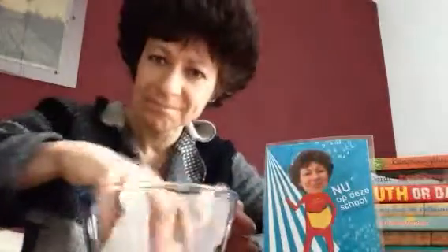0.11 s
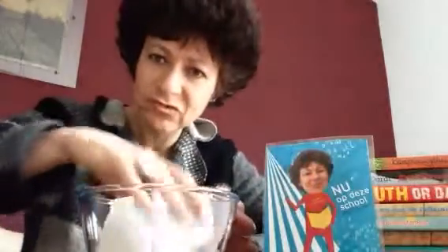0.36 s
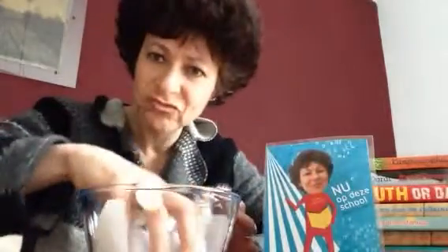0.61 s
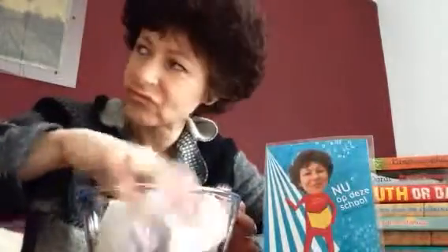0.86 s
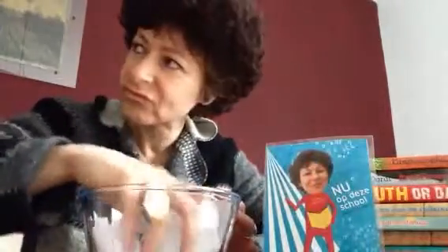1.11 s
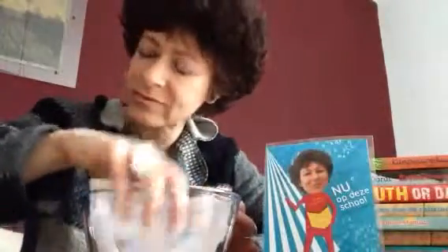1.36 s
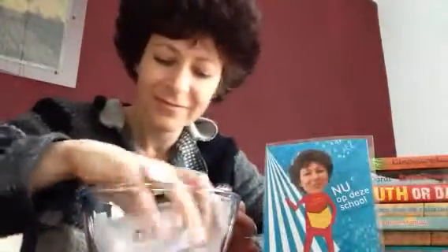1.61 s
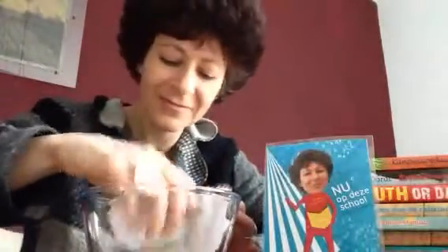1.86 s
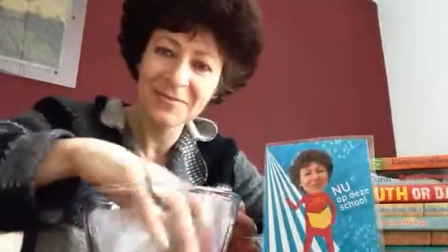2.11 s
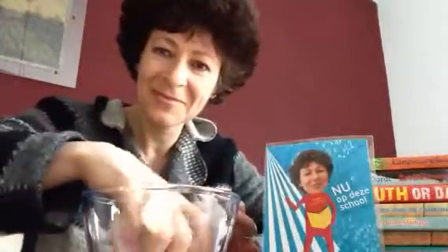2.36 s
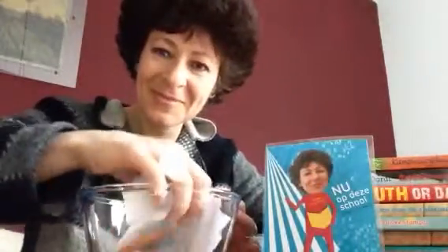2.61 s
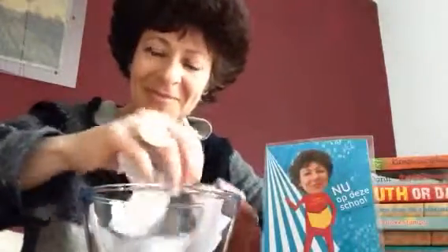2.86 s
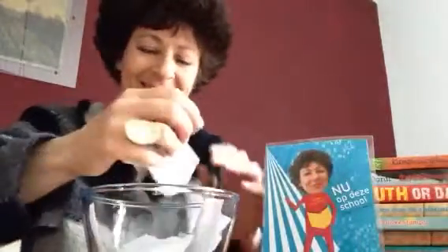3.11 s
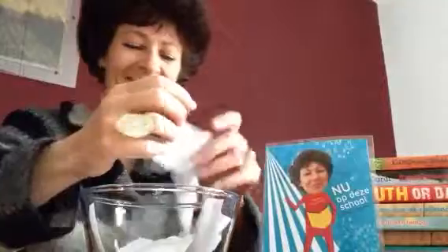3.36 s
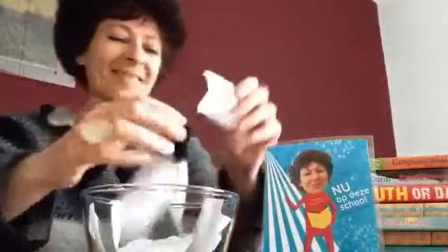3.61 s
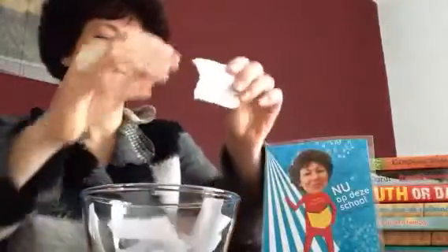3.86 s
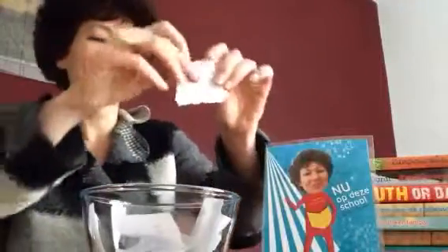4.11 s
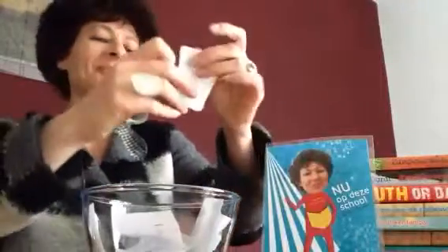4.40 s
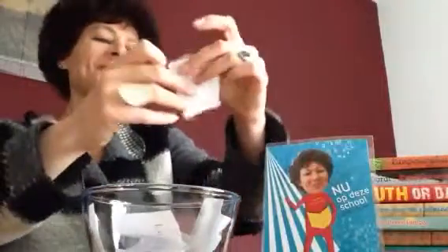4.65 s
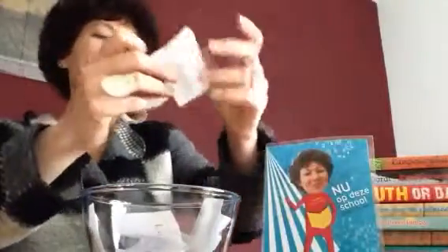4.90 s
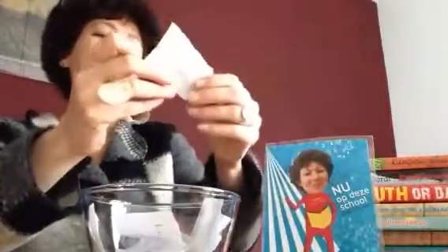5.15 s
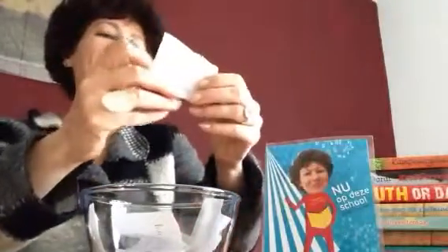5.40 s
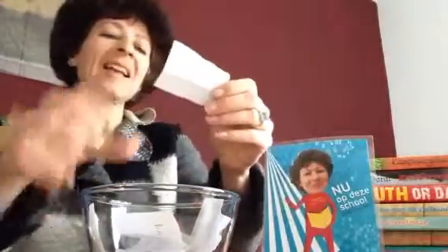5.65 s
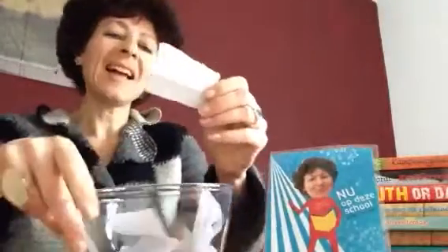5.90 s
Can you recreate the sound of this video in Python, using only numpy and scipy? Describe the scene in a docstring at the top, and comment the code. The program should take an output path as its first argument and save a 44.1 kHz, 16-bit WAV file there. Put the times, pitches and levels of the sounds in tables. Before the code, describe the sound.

Close, dry paper rustling inside a glass bowl, a hard early thump and small glass clinks, then sparse crisp snaps of a slip opening.

```python
"""A small furnished room, one close microphone: a hand stirs folded paper slips in a glass bowl on a
wooden table, then unfolds one slip in the air. Clumped clicks through bowl resonances make the crackle,
finer ones the hiss of sliding paper; creases snap as short resonant bursts. Bumps ring the modes of the
table, a finger ring those of the glass, and drags hum as noise in one low band. Filtered noise is the echo."""
import sys
import numpy as np
from scipy import signal
from scipy.fft import rfft, irfft
from scipy.io import wavfile

SR = 44100
rng = np.random.default_rng(int(sys.argv[2]) if len(sys.argv) > 2 else 0)


def wav_out(sig):
    """Save sig, one row per channel (or a flat mono array), as 16-bit PCM at SR to the path in sys.argv[1]."""
    wavfile.write(sys.argv[1], SR, np.round(np.clip(np.atleast_2d(sig).T, -1, 1) * 32767).astype(np.int16))


def amplitude_ratio(level_db):
    """Convert a level in decibels to the matching linear amplitude (field) ratio."""
    exponent = np.asarray(level_db, float) / 20
    return 10 ** exponent


N = 264688


def unit_rms(x):
    """Scale to unit rms."""
    return x / np.sqrt(np.mean(x ** 2) + 1e-20)


def drift(rate_hz):
    """Slow random wander of rms 1: noise through a double one-pole low-pass."""
    r = np.exp(-2 * np.pi * rate_hz / SR)
    noise = rng.standard_normal(N + SR)
    return unit_rms(signal.lfilter([1], [1, -2 * r, r * r], noise)[SR:])


def coloured(x, spectrum):
    """Filter by a spectrum drawn on a log-frequency axis; rms 1."""
    hz, level_db = np.transpose(spectrum)
    grid_hz = np.maximum(np.fft.rfftfreq(N, 1 / SR), 1)
    gain = amplitude_ratio(np.interp(np.log(grid_hz), np.log(hz), level_db))
    return unit_rms(irfft(rfft(x) * gain, N))


def ring(clicks, hz, t60_s):
    """Damped mode: a unit click starts a sine of height 1."""
    r, w = amplitude_ratio(-60 / (t60_s * SR)), 2 * np.pi * hz / SR
    return signal.lfilter([0, np.sin(w)], [1, -2 * r * np.cos(w), r * r], clicks + 1e-18)


def damped(t60_s, loss_per_s):
    """Decay time of a mode once a touch adds its loss."""
    return 1 / (1 / t60_s + loss_per_s)


def resonance(x, hz, width_hz):
    """Two-pole band-pass, peak gain 1."""
    r = np.exp(-np.pi * width_hz / SR)
    poles = [1, -2 * r * np.cos(2 * np.pi * hz / SR), r * r]
    return signal.lfilter([(1 - r * r) / 2, 0, (r * r - 1) / 2], poles, x)


def add(out, start_s, sound):
    """Mix a short sound in at its start time."""
    at = round(start_s * SR)
    out[at:at + len(sound)] += sound[:N - at]


def grains(per_s, spread_db, clump_db, clump_rate_hz):
    """Tiny clicks of random size and sign, in clumps."""
    sizes = amplitude_ratio(spread_db * np.minimum(rng.exponential(1, N), 5)) * rng.choice([-1, 1], N)
    hits = rng.random(N) < per_s / SR
    return sizes * hits * amplitude_ratio(clump_db * drift(clump_rate_hz))


# Resonances of the air in the bowl. Each row: frequency in Hz, width in Hz, relative level in dB.
BOWL_MODES = [(689.3, 41, 2.5), (1090, 320, -2.5), (1383, 160, -0.5), (1620, 80, 1.5), (2050, 270, -7.5),
              (2500, 86, -1), (2930, 240, -10.5)]
# Crackle spectrum outside the bowl. Each row: frequency in Hz, relative level in dB per Hz.
CRACKLE_SPECTRUM = [(180, -36), (300, -5.5), (416, -11), (704, 0), (1020, 12.5), (1570, -2), (1870, -3.5),
                    (2460, 1.5), (6000, -47), (7800, -41.5), (13200, -120)]


def crackle(clicks, inside):
    """Fibres and folds give clicks, heard partly through the air in the bowl."""
    bowl = np.zeros(N)
    for k, (hz, width_hz, db) in enumerate(BOWL_MODES):
        favoured = clicks * amplitude_ratio(3.9 * drift(37.0))  # the moving hand favours one resonance, then another
        bowl += amplitude_ratio(db) * resonance(favoured, hz, width_hz) * (-1) ** k
    return inside * unit_rms(bowl) + (1 - 0.93 * inside) * coloured(clicks, CRACKLE_SPECTRUM)


# Hiss of paper faces in the bowl. Each row: frequency in Hz, relative level in dB per Hz.
SLIDE_IN_BOWL = [(1760, -4.5), (3000, -5.5), (3740, -8.5), (6390, -8), (9260, -12.5), (14300, -17),
                 (15500, -6)]
# The same hiss in the open air. Each row: frequency in Hz, relative level in dB per Hz.
SLIDE_IN_AIR = [(500, -10.5), (1100, -4), (2200, -3.5), (3550, -13), (4600, -6), (6400, -5), (9000, -15),
                (15500, -10.5)]


def slide(clicks, inside):
    """Faces of paper slide: dense fine clicks blur into hiss."""
    fine = grains(per_s=7900, spread_db=2, clump_db=1.5, clump_rate_hz=30)
    faces = unit_rms(fine) + 0.06 * unit_rms(clicks)  # every crack also has a bright edge
    shut = np.clip(inside / inside.max(), 0, 1)
    return np.sqrt(shut) * coloured(faces, SLIDE_IN_BOWL) + (1 - shut) * coloured(faces, SLIDE_IN_AIR)


# Modes of the table, also rung by bumps().
# Each row: frequency in Hz, relative level in dB, undamped t60 in seconds.
TABLE_MODES = [(116, -33, 0.12), (176.5, -14, 1.1), (235, 0, 0.16), (345, -11, .14), (384, -17, 0.4),
               (445, -14, 0.25), (548, -18, 0.2), (700, -18, .1), (805, -11, 0.15), (935, -8, 0.12),
               (1070, -14, 0.05), (1360, -13, .03), (1850, -4, .012)]


def table_shake():
    """Stirring shakes the table: wandering noise through wide bands at five of its modes; rms 1."""
    rubbing = rng.standard_normal(N) * amplitude_ratio(3 * drift(6.7))
    return unit_rms(sum(resonance(rubbing, hz, 0.26 * hz) for hz, _, _ in TABLE_MODES[1:6]))


# Fingers close on a bunch of slips.
# Each row: time of peak in seconds, crackle in dB, hiss in dB, length in seconds.
SQUEEZES = [(0.141, -41, -49.5, 0.088), (0.267, -46, -40.5, 0.021), (0.533, -37, -64, 0.054),
            (0.685, -33, -46.5, 0.043), (0.775, -31, -43.5, 0.036), (0.947, -54, -57, 0.036),
            (1.107, -60, -52.5, 0.033), (1.256, -51.5, -51, 0.096), (1.445, -55, -55, 0.03),
            (1.498, -45, -72, 0.033), (1.604, -47.5, -60, 0.16), (1.823, -61, -57, 0.032),
            (1.91, -31.5, -36.5, 0.0056), (1.987, -30, -37, 0.0084), (2.177, -47, -53.5, 0.098),
            (2.412, -47, -68, 0.033), (2.465, -40, -44, 0.024), (2.642, -62, -67, 0.038),
            (2.692, -45, -45.5, 0.018), (2.994, -61, -61.5, 0.13), (3.519, -66, -59, 0.15),
            (3.636, -84, -62, 0.052), (3.777, -58.5, -61, 0.028), (3.885, -49, -50.5, 0.013),
            (4.238, -84, -70.5, 0.072), (4.74, -82, -61.5, 0.083), (4.886, -84, -57.5, 0.026),
            (5.256, -87.5, -67, 0.025), (5.392, -69, -55, 0.018), (5.579, -84, -71, 0.04),
            (5.668, -64.5, -63.5, 0.031), (5.763, -73, -65.5, 0.0051), (5.848, -51, -63, 0.026)]


def squeezes():
    """Gain curves of crackle and hiss: each squeeze swells to its peak and dies away."""
    rise = 0.41  # share of the length spent swelling
    hop = 64     # samples per curve point
    peak_s, crackle_db, hiss_db, length_s = (c[:, None] for c in np.transpose(SQUEEZES))
    late = (np.arange(0, N + hop, hop) / SR - peak_s) / length_s
    shape = np.exp(np.where(late < 0, -(late / rise) ** 2, -late / (1 - rise)))
    points = np.arange(late.shape[1])
    return [np.interp(np.arange(N) / hop, points, np.sum(amplitude_ratio(db) * shape, axis=0))
            for db in (crackle_db, hiss_db)]


# Changing bed of the handling, under the single squeezes.
# Each row: time in seconds, crackle in dB, hiss of sliding faces in dB, table shake in dB.
HANDLING = [(0, -54, -54.5, -51.5), (.2, -69, -54, -72.5), (.45, -66, -61, -45), (.62, -62, -56.5, -52.5),
            (.8, -53.5, -52.5, -72), (1.2, -49.5, -56, -85), (1.68, -59.5, -55, -67),
            (1.79, -74, -67.5, -63), (1.85, -67, -53, -65.5), (2.1, -57.5, -53, -81),
            (2.31, -61, -64.5, -62), (2.37, -50.5, -51.5, -58), (2.62, -52.5, -50, -77),
            (2.76, -59, -59, -71), (2.93, -66, -66, -70), (3.168, -69, -66, -74), (3.219, -75, -80.5, -83),
            (3.419, -73, -80.5, -74), (3.601, -81, -76, -71), (3.901, -66, -65, -85),
            (4.099, -78.5, -82, -71), (4.249, -82, -70.5, -73.5), (4.42, -77, -65, -89.5),
            (4.449, -73, -62.5, -70), (4.7, -86, -64.5, -71.5), (4.921, -68.5, -67, -74),
            (5.1, -75, -73, -73), (5.781, -82.5, -80, -74.5), (5.83, -68.5, -61.5, -48),
            (6, -54.5, -71, -62)]
# Crackle made inside the bowl. Each row: time in seconds, share 0-1.
INSIDE_SHARE = [(0, 0.88), (3.05, 0.78), (3.3, 0.37), (5.75, 0.037), (5.821, 0.24)]


def rustle():
    """Crackle and hiss follow bed plus squeezes; the table shake follows the bed."""
    t = np.arange(N) / SR
    s, *levels_db = np.transpose(HANDLING)
    crackle_gain, slide_gain, shake_gain = (amplitude_ratio(np.interp(t, s, db)) for db in levels_db)
    crackle_squeeze, slide_squeeze = squeezes()
    inside = np.interp(t, *np.transpose(INSIDE_SHARE))
    clicks = grains(per_s=450, spread_db=3, clump_db=2.5, clump_rate_hz=10)
    paper = (crackle_gain + crackle_squeeze) * crackle(clicks, inside)
    paper += (slide_gain + slide_squeeze) * slide(clicks, inside)
    return paper + shake_gain * table_shake()


# Slip held open, ringing as a small sheet.
# Each row: frequency in Hz, width as share of frequency, relative level in dB.
SHEET_MODES = [(420, .4, -1.5), (900, 0.37, -6.5), (1247, 0.15, 0.5), (2360, 0.34, -3), (4170, .22, -12.5),
               (6730, .15, -16)]
# Creases snapping. Each row: start in seconds, body peak in dB, pitch in Hz, treble peak in dB,
# fade in seconds (0.5 ms at least).
SNAPS = [(0.102, -39, 2200, -57, 0.0036), (.122, -36, 1480, -59, 0.0011), (0.158, -41, 1370, -60, 0.0055),
         (0.2605, -34, 3000, -34, 0.0044), (0.46, -40.5, 2500, -48, 0.0065),
         (0.528, -32, 1790, -55, 0.0018), (0.544, -33, 2030, -54, 0.0024), (.668, -40, 1453, -48, .005),
         (.693, -29, 1620, -54, 0.0034), (.706, -39, 1490, -68, 0.0024), (.764, -31, 1510, -47, 0.0011),
         (.7775, -27, 1430, -50, 0.0028), (0.823, -35.5, 1570, -40, 0.011), (0.905, -33, 2300, -40, 0.0098),
         (0.954, -36.5, 930, -41, 0.0021), (1.04, -35, 2880, -60, 0.0045),
         (1.258, -30.5, 1340, -52, 0.0041), (1.267, -40, 1300, -52, 0.0024),
         (1.31, -38.5, 2500, -40, 0.006), (1.355, -39, 1330, -48.5, 0.0032),
         (1.419, -41, 1120, -45, 0.0089), (1.482, -35.5, 800, -70, 0.0034), (1.504, -33, 1520, -60, 0.0024),
         (1.494, -35.5, 730, -60, 0.002), (1.531, -29, 950, -57, 0.0011), (1.535, -32.5, 2050, -57, 0.0021),
         (1.555, -36, 2000, -60, 0.0017), (1.57, -36, 2070, -60, 0.0057), (1.583, -33, 1300, -55, 0.0029),
         (1.654, -48, 2310, -45, 0.0022), (1.909, -51, 1420, -36, 0.0021), (1.987, -39, 1570, -39, 0.00039),
         (2.15, -34.5, 1460, -40.5, 0.0077), (2.173, -32.5, 1500, -56, 0.0032),
         (2.39, -35.5, 1680, -43, 0.0074), (2.4015, -38, 1750, -55, 0.0017), (2.423, -51, 1000, -56, 0.002),
         (2.442, -38, 790, -56, 0.0023), (2.464, -32, 1720, -31.5, 0.0029),
         (2.477, -36.5, 1580, -42, 0.0048), (2.536, -39.5, 1400, -46, 0.0023),
         (2.597, -46, 1900, -44, 0.0024), (2.634, -34, 1280, -64, 0.0099), (2.687, -34.5, 900, -48, 0.009),
         (2.691, -42, 1500, -36, 0.0062), (2.947, -46, 2580, -45, 0.0035), (2.981, -43, 2500, -44, 0.023),
         (3.476, -39, 1440, -58, 0.0011), (3.484, -33, 1350, -72, 0.0026), (3.538, -50, 750, -52, 0.0011),
         (3.566, -36, 1003, -48, 0.0053), (3.604, -55, 2200, -56, .001), (3.655, -47.5, 2020, -62, 0.0018),
         (3.636, -47, 1960, -44.5, 0.0043), (3.761, -51, 1204, -47, 0.004),
         (3.774, -42.5, 2650, -42.5, 0.0054), (3.834, -50, 1130, -68.5, 0.0033),
         (3.865, -39.5, 2310, -60, 0.0065), (3.883, -33.5, 1310, -62, 0.0019),
         (4.238, -54.5, 1400, -60, 0.0037), (4.268, -55, 6200, -52, 0.0039),
         (4.7485, -32.5, 1480, -60, 0.00096), (4.7537, -19, 2090, -62, 0.0016),
         (4.7658, -41, 1460, -60, 0.00048), (4.769, -37, 2500, -60, 0.003), (4.79, -45, 3020, -62, 0.00074),
         (4.829, -42, 2150, -60, 0.0031), (4.9032, -27.5, 2160, -57, 0.0011),
         (4.996, -54.5, 1166, -70.5, 0.0028), (5.029, -28.5, 1300, -68, 0.0026),
         (5.253, -53.5, 1346, -55, 0.0019), (5.391, -42, 4450, -55, 0.004), (5.405, -50, 2100, -54, 0.0023),
         (5.663, -52, 920, -61, 0.0069), (5.698, -51, 1006, -46.5, 0.0043), (5.754, -50, 5300, -44.5, 0.01),
         (5.817, -38, 1210, -45, 0.00054), (5.83, -38, 690, -65, 0.003), (5.842, -34.5, 1140, -58, 0.001),
         (5.849, -36, 1300, -51, 0.0038), (5.861, -36, 1190, -62, 0.0012), (5.862, -44, 1190, -59, 0.0019),
         (5.875, -33, 990, -46, 0.0013), (5.885, -41, 850, -35, 0.0022), (5.926, -63, 1706, -42, 0.0034),
         (5.961, -48, 4970, -50, 0.0022), (5.984, -38.5, 1300, -48, 0.0033)]


def snaps():
    """A crease gives way: a ragged burst rings briefly in the sheet, with a bright spit."""
    open_from_s, open_to_s = 3.2, 5.79         # a slip is held in the air
    sheet_share, sheet_fall_db_per_oct = 0.63, 5  # fall away from the pitch of the snap
    after_share, after_rarity, after_fade_s = 0.7, 2.6, 0.017  # rarity in noise spreads
    # each row: multiple of the pitch, width as share of frequency, gain
    partials = [(.22, 0.9, 0.28), (.58, .3, .3), (1.001, 0.33, 1), (1.9, 0.34, 0.2), (2.9, 0.66, 0.09)]
    out, t = np.zeros(N), np.arange(3500) / SR
    noise = rng.standard_normal((len(SNAPS), 2, len(t)))
    bright = signal.butter(2, 3600, "high", fs=SR, output="sos")
    for (s, peak_db, hz, treble_db, fade_s), (low, high) in zip(SNAPS, noise):
        shape = np.exp(-t / max(fade_s, .0005)) * (1 - np.exp(-t / 0.00022))
        burst = low * shape
        # the fold settles in a few smaller ticks
        burst += after_share * low * (np.abs(high) > after_rarity) * np.exp(-t / after_fade_s)
        burst[12] += 4  # the break itself is one clean click
        body = np.zeros(len(t))
        for k, wide, gain in partials:
            once = resonance(burst, k * hz, wide * hz)
            body += gain * resonance(once, k * hz, 0.89 * wide * hz)
        if open_from_s < s < open_to_s:
            for k, (f, wide, db) in enumerate(SHEET_MODES):
                gain = sheet_share * amplitude_ratio(db - sheet_fall_db_per_oct * abs(np.log2(f / hz)))
                once = resonance(burst, f, wide * f)
                body += gain * resonance(once, f, wide * f) * (-1) ** k
        spit = signal.sosfilt(bright, high * shape)
        add(out, s, amplitude_ratio(peak_db) * body / np.abs(body).max() + amplitude_ratio(treble_db) * spit / np.abs(spit).max())
    return out


# Bumps on bowl and table. Each row: start in seconds, peak in dB, hardness 0-1.
BUMPS = [(0.2772, -1, 0.85), (0.567, -30.5, 0.35), (0.599, -36.5, 0.39), (1.076, -37.5, 0.42),
         (1.094, -34, .47), (1.576, -35, 0.45), (1.894, -39, 0.4), (2.15, -30, 0.44), (2.197, -38.5, 0.46),
         (2.426, -39.5, 0.42), (2.938, -54.5, 0.2), (3.467, -50, 0.6), (3.476, -47.5, 0.41),
         (4.084, -60.5, 0.4), (4.232, -58, 0.73), (4.261, -51.5, 1), (4.433, -53, 0.3),
         (4.752, -34.5, 0.64), (4.906, -45, 0.7), (5.022, -50.5, 0.41), (5.486, -44.5, 0.62),
         (5.699, -51.5, 0.2), (5.822, -42.5, 0.95), (5.8414, -32, 0.88), (5.8684, -23.5, 0.51),
         (5.925, -52, 0.4), (5.937, -34, 0.43), (5.983, -37, 0.4)]


def bumps():
    """A push into the table top; a soft contact lasts longer, scuffs, and leaves high modes silent."""
    soft_contact_s, hard_contact_s = .009, .00095
    soft_loss_per_s, loss_power = 45, 1.8  # a soft touch lingers on the wood; a hard rap leaves at once
    out, t = np.zeros(N), np.arange(SR // 2) / SR
    chance_db = rng.normal(0, 3, (len(BUMPS), len(TABLE_MODES)))
    noise = rng.standard_normal((len(BUMPS), 2, len(t)))
    crowded = signal.butter(4, [300, 1120], "band", fs=SR, output="sos")
    crack_band = signal.butter(2, [1300, 2900], "band", fs=SR, output="sos")
    for (s, peak_db, hardness), own_db, (scuff, rattle) in zip(BUMPS, chance_db, noise):
        softness = 1 - hardness
        loss_per_s = soft_loss_per_s * softness ** loss_power
        width_s = soft_contact_s * (hard_contact_s / soft_contact_s) ** hardness
        phase = np.pi * t[t < width_s] / width_s
        contact = np.sin(phase) ** 2
        force = 0.083 * softness * scuff * np.exp(-t / 0.034)
        force[0] = 1
        push = np.convolve(force, contact / contact.sum())[:len(t)]
        knock = np.zeros(len(t))
        for (hz, db, t60_s), own in zip(TABLE_MODES, own_db):
            knock += amplitude_ratio(db + 2.4 * softness * own) * ring(push, hz, damped(t60_s, loss_per_s))
        # the contact itself radiates a two-sided pulse
        knock[:len(contact)] -= 3.2 * hardness ** 2 * np.sin(2 * phase) * np.sqrt(contact)
        # many close modes of the wood blur into a dying rumble
        rumble = rattle * amplitude_ratio(-60 * t / damped(3, .6 * loss_per_s + 1))
        knock += .65 * hardness ** 2 * signal.sosfilt(crowded, rumble)
        knock += 1.5 * softness ** 2 * ring(push, 58, .2)  # a soft shove rocks the whole table
        crack = 2.5 * signal.sosfilt(crack_band, scuff * np.exp(-t / 0.0007))
        knock += hardness ** 6 * (crack + 1.6 * ring(force, 1880, .009))  # a hard rap also cracks
        add(out, s, amplitude_ratio(peak_db) * knock / np.abs(knock).max())
    return out


# Mode frequencies of the glass. Each entry: frequency in Hz.
GLASS_HZ = [697, 1744, 1792, 3156, 4935, 4960, 7031, 9458, 9625, 9787, 9862, 10430, 10770, 12200, 12410,
            13240, 13710, 14060, 15040, 15240]
# The same modes in order. Each row: relative level in dB, undamped t60 in seconds,
# reach of a resting hand (factor on its loss).
GLASS_MODES = [(-46, 0.87, 0.29), (-30, 0.45, 1.3), (-33, 0.06, 2), (-33, 0.56, 1.5), (-40.5, 0.067, 0.03),
               (-38, 0.06, 0.03), (-40.5, 0.098, 0.18), (-52.5, 0.13, 0.91), (-44.5, 0.081, 0.6),
               (-49, 0.18, 2.8), (-72, 0.12, 1.15), (-46.5, 0.058, 2.6), (-55.5, 0.11, 2),
               (-49.5, 0.064, 0.1), (-55, 0.099, 0.53), (-60.5, 0.116, 2.5), (-69, .13, .5),
               (-66, 0.11, .5), (-64.5, 0.13, .5), (-62, 0.1, 0.51)]
# Ring on glass. Each row: start in seconds, level in dB added to every mode,
# brightness in dB per octave about 7 kHz, hand loss in 1/s.
CLINKS = [(2.3199, -27, 15, 15), (2.3214, 1, -3.5, 16), (5.8685, 2, 12, 0.11), (5.8785, -7, 3, 0.5)]


def clinks():
    """Metal on glass rings its modes; a hand full of paper inside the bowl shortens them."""
    out, click, t = np.zeros(N), np.zeros(SR // 2), np.arange(400) / SR
    click[0] = 1
    for s, level_db, tilt_db, loss_per_s in CLINKS:
        for hz, (db, t60_s, reach) in zip(GLASS_HZ, GLASS_MODES):
            gain = amplitude_ratio(db + level_db + tilt_db * np.log2(hz / 7000))
            add(out, s, gain * ring(click, hz, damped(t60_s, loss_per_s * reach)))
        # broad tick of the contact itself
        tick = signal.lfilter([1.5, -1.5], [1, -.75], rng.standard_normal(len(t)))
        add(out, s, amplitude_ratio(-37) * tick * np.exp(-t / 0.0013))
    return out


# Hand or sleeve drags.
# Each row: start in seconds, fade length in seconds, rms before shaping in dB, frequency in Hz.
DRAGS = [(3.465, 0.0075, -41, 454), (3.474, .008, -39, 420), (4.232, .04, -61, 340),
         (4.435, 0.17, -60.5, 178), (4.44, 0.094, -63.5, 341), (4.605, 0.05, -68.5, 303),
         (4.904, 0.011, -40.5, 450), (5.826, 0.038, -42.5, 490)]


def drags():
    """Rough rubbing hums through one low resonance: quick swell, then fade."""
    out, t = np.zeros(N), np.arange(SR // 2) / SR
    for s, length_s, db, hz in DRAGS:
        width_hz = 0.16 * hz
        once = resonance(rng.standard_normal(len(t)), hz, width_hz)
        hum = unit_rms(resonance(once, hz, width_hz))
        add(out, s, amplitude_ratio(db) * hum * (1 - np.exp(-t / 0.0036)) * np.exp(-(t / length_s) ** 2))
    return out


# Echo bands. Each row: low edge in Hz, high edge in Hz, t60 in seconds, relative level in dB.
ECHO_BANDS = [(100.4, 450, 1, -13.5), (400, 2100, 0.084, -20.5), (1300, 5600, 0.23, -17.5),
              (3500, 8100, 0.25, -22)]


def room(x):
    """Dense echo: noise that sets in after the first walls answer; the lowest band lasts longest."""
    t = np.arange(SR) / SR
    echo = np.zeros(SR)
    for low_hz, high_hz, t60_s, db in ECHO_BANDS:
        sos = signal.butter(2, [low_hz, high_hz], "band", fs=SR, output="sos")
        band = signal.sosfilt(sos, rng.standard_normal(SR))
        tail = np.clip((t - .004) / .008, 0, 1) * amplitude_ratio(-60 * t / t60_s)
        echo += amplitude_ratio(db) * band * tail / np.sqrt(np.sum(tail ** 2))
    return signal.fftconvolve(x, echo)[:N]


def scene():
    """Bowl, paper and table with their echo."""
    near = rustle() + snaps() + bumps() + clinks() + drags()
    return (near + room(near))[None]


def band_limit(x):
    """A steep low-pass at the top of the band."""
    return signal.sosfilt(signal.butter(12, 16270, fs=SR, output="sos"), x)


# Quiet floor of the microphone. Each row: frequency in Hz, relative level in dB per Hz.
FLOOR_SPECTRUM = [(15, -29.5), (28, -6.5), (129, 3.5), (410, -13), (567, -12.5), (826, -17.5), (2490, -18),
                  (3530, -19), (15500, -30)]


def record(dry):
    """The small microphone loses the deep bass, adds its quiet floor and loses the very top."""
    low_hz, top_hz, floor_db = 118.7, 15800, -75
    mix = signal.sosfilt(signal.butter(2, low_hz, "high", fs=SR, output="sos"), dry)
    mix = mix + amplitude_ratio(floor_db) * coloured(rng.standard_normal(N), FLOOR_SPECTRUM)
    mix = signal.sosfilt(signal.cheby2(14, 50, top_hz, fs=SR, output="sos"), mix)
    return band_limit(mix)


dry = scene()
out = record(dry)
wav_out(out)
```